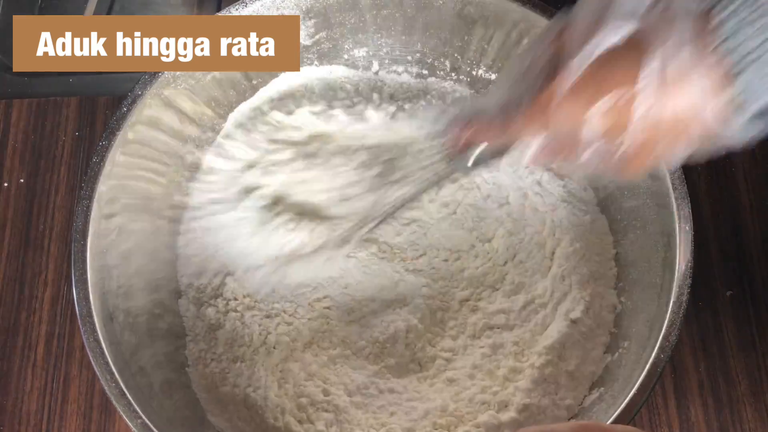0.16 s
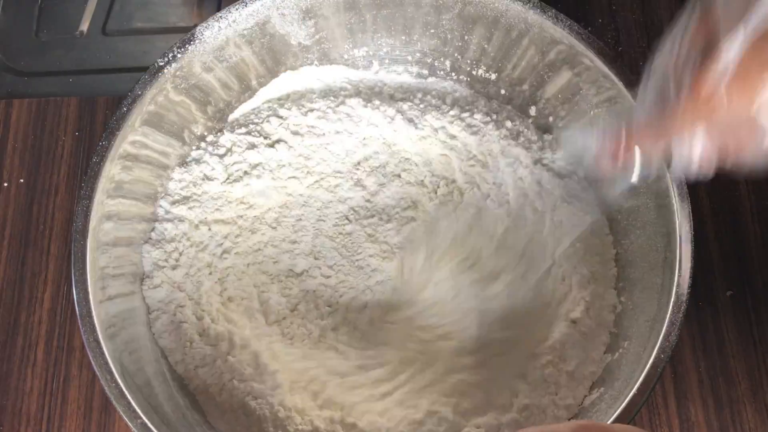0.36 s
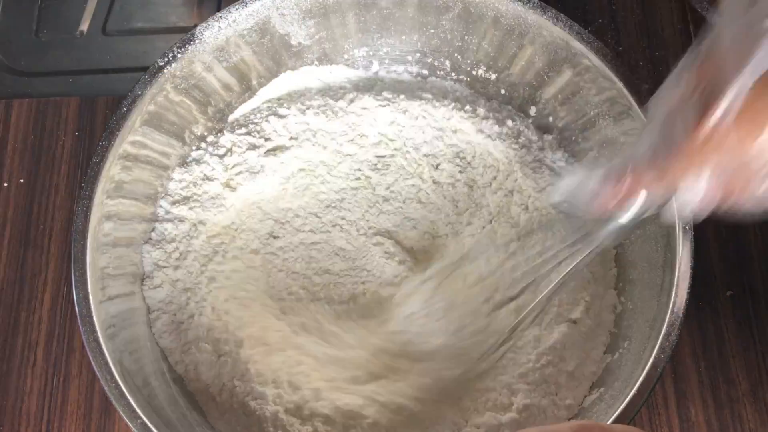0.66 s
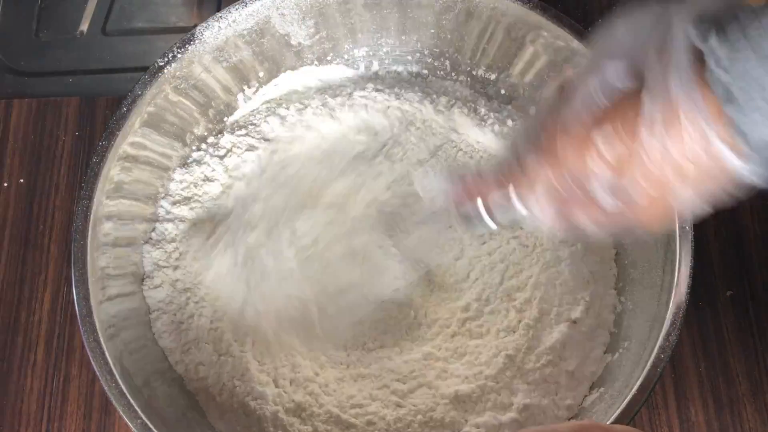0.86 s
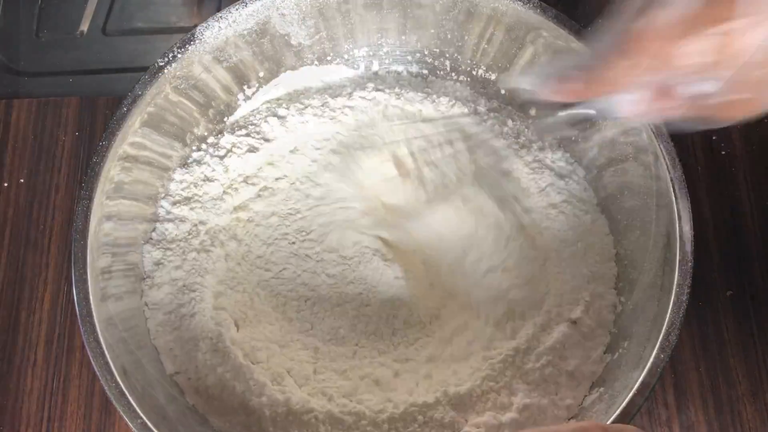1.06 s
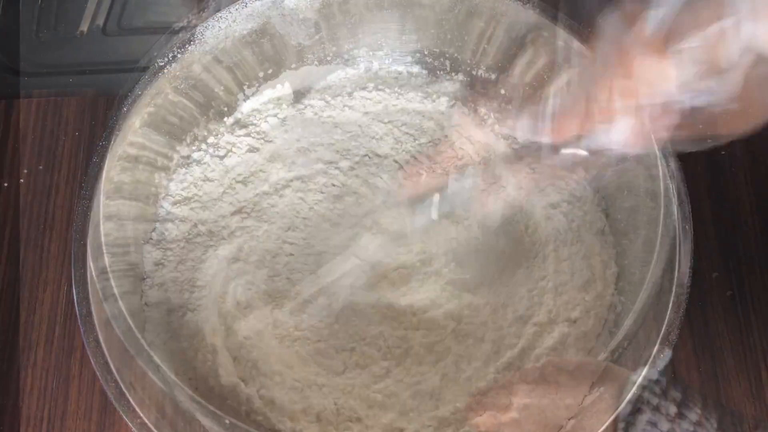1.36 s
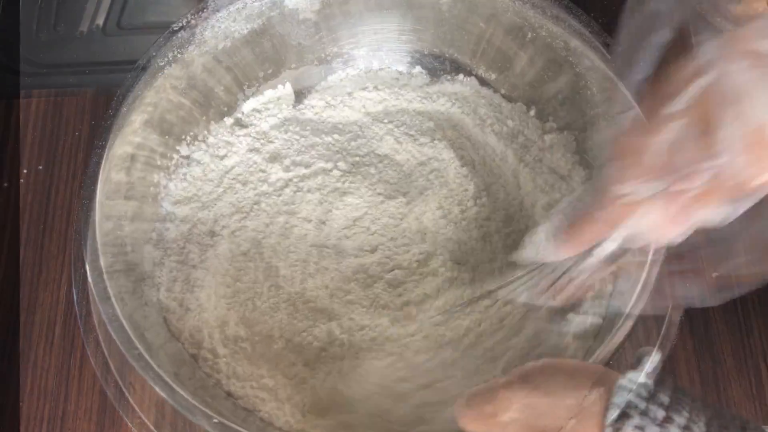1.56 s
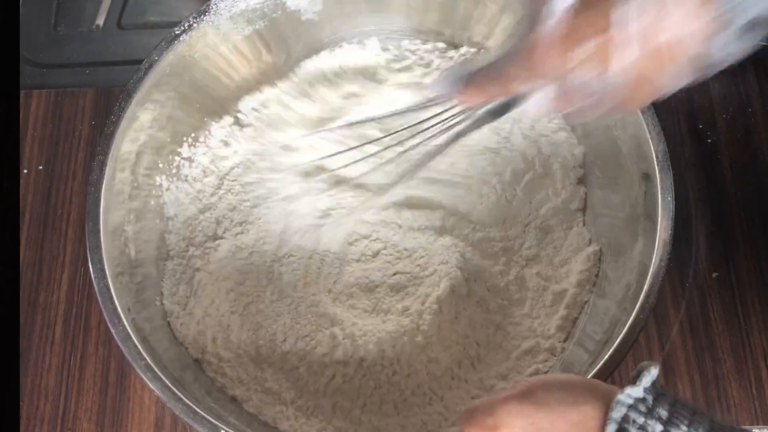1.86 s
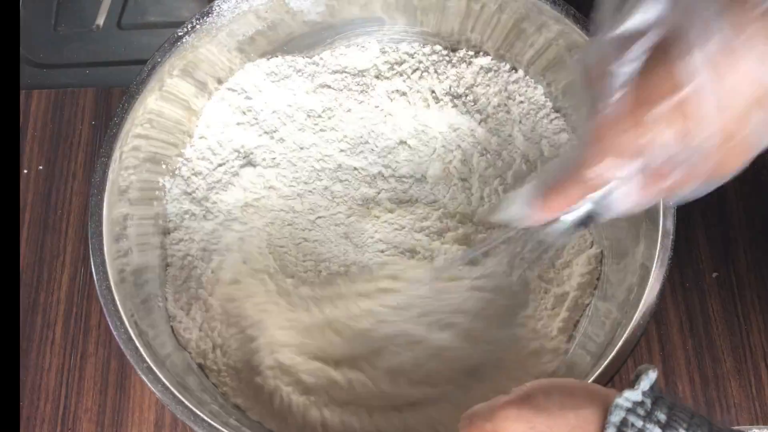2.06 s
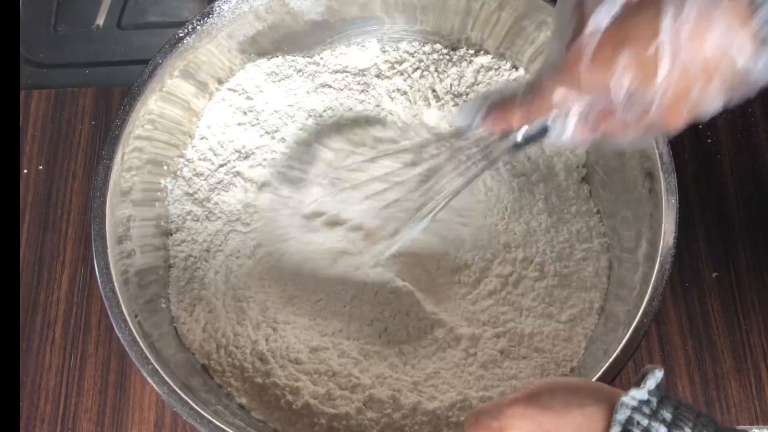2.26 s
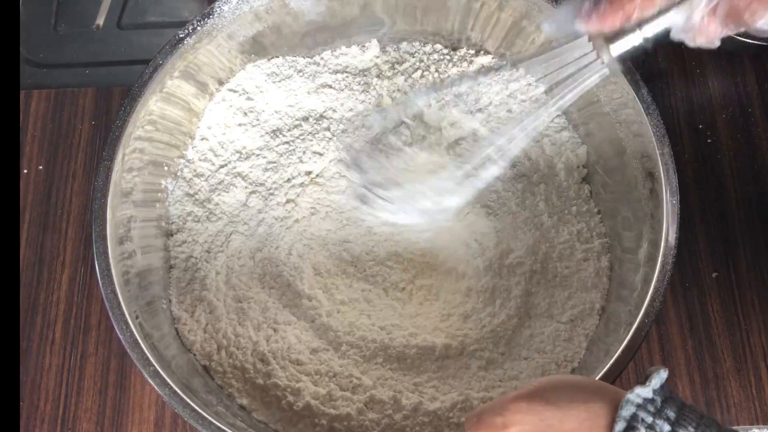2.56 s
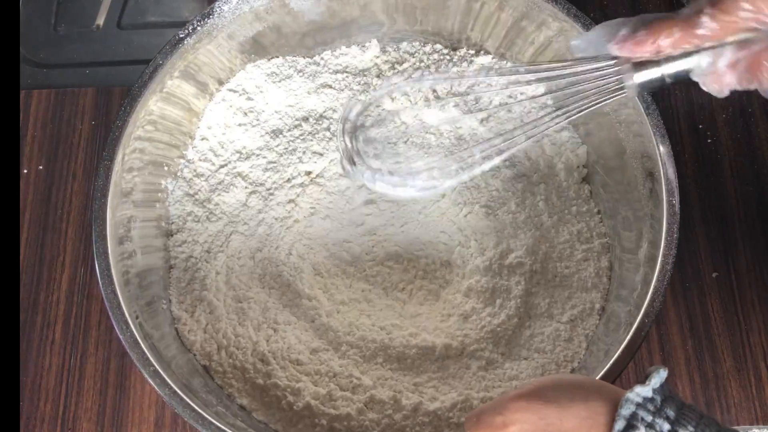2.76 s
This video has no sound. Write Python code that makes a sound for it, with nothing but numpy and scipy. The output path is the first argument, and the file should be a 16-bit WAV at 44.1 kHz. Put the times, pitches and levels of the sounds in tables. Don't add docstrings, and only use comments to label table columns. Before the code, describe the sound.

A wire whisk swishes quickly round through dry flour in a steel bowl, with grainy hiss, scrapes and dull bumps, then lifts and knocks the rim once; close microphone, quiet kitchen with faint hum.

```python
import sys
import numpy as np
from scipy import signal
from scipy.fft import rfft, irfft
from scipy.io import wavfile
from scipy.ndimage import uniform_filter1d

SR = 44100
rng = np.random.default_rng(int(sys.argv[2]) if len(sys.argv) > 2 else 0)


def inscribe(sig):
    pcm = np.round(np.clip(np.atleast_2d(sig).T, -1, 1) * 32767)
    wavfile.write(sys.argv[1], SR, pcm.astype(np.int16))


def boost(x):
    u = np.asarray(x, float) / 20
    return 10 ** u


N = 127890
T = np.arange(N) / SR

# frequency in Hz, density in dB per Hz.
POWDER_SPECTRUM = [(1760, -43), (3000, -18), (5530, -15.5), (6490, -9.5), (11500, -4), (13500, -2.5),
                   (15000, 1.5), (15800, 0)]
# frequency in Hz, width in Hz, level in dB.
WIRE_MODES = [(4600, 900, -6), (5620, 830, -2), (6700, 1600, -6.5), (8200, 4600, -1)]


def evened(x):
    return x / np.sqrt(np.mean(x ** 2) + 1e-20)


def evened_at(shape, x):
    return x / np.sqrt(np.sum((shape * x) ** 2) / np.sum(shape ** 2) + 1e-20)


def add(mix, s, sound):
    part = mix[round(s * SR):][:len(sound)]
    part += sound[:len(part)]


def coloured(x, points):
    f, db = np.transpose(points)
    log_hz = np.log(np.fft.rfftfreq(N, 1 / SR) + 1)
    gain = boost(np.interp(log_hz, np.log(f), db))
    return evened(irfft(rfft(x) * gain, N))


def resonate(x, hz, width):
    turn = np.exp(2j * np.pi * hz * np.arange(len(x)) / SR)
    r = np.exp(-np.pi * width / SR)
    return 2 * (turn * signal.lfilter([1 - r], [1, -r], x / turn)).real


def resonate_twice(x, hz, width):
    return resonate(resonate(x, hz, width), hz, width)


def bell(t, s, rise, fall):
    return np.exp(-.5 * ((t - s) / np.where(t < s, rise, fall)) ** 2)


def drift(hz):
    w = max(int(SR / hz / 2), 1)
    return evened(uniform_filter1d(uniform_filter1d(rng.standard_normal(N), w), w))


def grains(spread_db, lump_db, lump_hz, flick_db):
    size_db = spread_db * np.minimum(rng.exponential(1, N), 6)
    size_db = size_db + lump_db * drift(lump_hz) + flick_db * drift(320)
    return boost(size_db) * rng.standard_normal(N)


def patchy(x, patch_db):
    z = signal.stft(x, nperseg=512)[2]

    def patches(bins, frames):
        across = uniform_filter1d(rng.standard_normal(z.shape), bins, 0)
        return evened(uniform_filter1d(across, frames, 1))

    field_db = patch_db * patches(12, 7) + 3.2 * patches(2, 3)
    return evened(signal.istft(z * boost(field_db), nperseg=512)[1][:N])


def control(column):
    # time in seconds, powder spray in dB, wire pressure on the steel in dB,
    # push through the heap in dB.
    stirring = [(0.0, -37.5, -44.5, -48), (0.28, -29, -36.5, -40), (0.32, -29.5, -41.5, -44.5),
                (0.57, -33, -39.5, -40), (0.6, -29.5, -38, -39.5), (0.64, -30, -38.5, -44),
                (1.27, -31.5, -38, -39.5), (1.33, -37, -46.5, -45.5), (1.41, -37, -36, -39.5),
                (1.47, -38, -47, -46.5), (1.49, -38, -35, -40), (1.69, -37, -37.5, -41),
                (1.78, -31.5, -33, -33), (2.09, -36.5, -41.5, -41.5), (2.43, -37.5, -41.5, -41),
                (2.49, -54, -58, -55), (2.77, -46.5, -55.5, -51), (2.86, -48, -51.5, -52)]
    rows = np.array(stirring)
    return boost(np.interp(T, rows[:, 0], rows[:, column]))


def kitchen():
    # time in seconds, hum level in dB.
    hum_levels = [(0.0, -48), (0.13, -43), (0.96, -43.5), (1.01, -41.5), (1.46, -35.5), (1.49, -46),
                  (1.53, -32), (1.65, -42), (1.79, -37), (2.33, -45.5), (2.86, -41), (2.9, -48)]
    # multiple of the mains frequency, level in dB.
    hum_overtones = [(2, -51.5), (3, -56.5), (4, -59.5)]
    # frequency in Hz, density in dB per Hz.
    room_spectrum = [(35, -44), (60, -8.5), (167, -13.5), (249, -19.5), (525, -17.5), (1010, -27),
                     (1610, -19), (2330, -38), (15800, -38.5)]
    s, db = np.transpose(hum_levels)
    mains_hz = 49.54 + .08 * drift(2.5)
    turn = 2 * np.pi * np.cumsum(mains_hz) / SR
    hum = np.sqrt(2) * boost(np.interp(T, s, db)) * np.sin(turn + 0.33)
    for multiple, overtone_db in hum_overtones:
        waver_db = 2.5 * drift(6)
        hum += boost(overtone_db + waver_db) * np.sin(multiple * turn + .5 * drift(7.9))
    floor_db = -49 + 1.2 * drift(10)
    return hum + boost(floor_db) * patchy(coloured(rng.standard_normal(N), room_spectrum), patch_db=-0.5)


def whisk():
    # frequency in Hz, width in Hz, level in dB.
    heap_modes = [(1900, 1430, 15.5), (2835, 620, 4.5), (3440, 230, -1)]
    lumps = boost(.3 * drift(25) + .6 * drift(60) + .8 * drift(500))
    fizz = patchy(coloured(grains(2.35, 0.34, 21, 0.96), POWDER_SPECTRUM), patch_db=0.8)
    out = boost(2.5) * control(column=1) * fizz
    for column, modes, db in ((2, WIRE_MODES, 0.5), (3, heap_modes, -0.98)):
        drive = grains(2.37, 0.36, 30, 0.73)
        rung = sum(boost(d) * evened(resonate(drive, f, w)) for f, w, d in modes)
        out = out + boost(db) * control(column) * patchy(rung, patch_db=1.83)
    bare = np.clip(np.minimum(T - 1.2, 2 - T) / .03, 0, 1)
    singing = evened(resonate(grains(4.5, 2., 90, 3.2), hz=5830, width=400))
    out = out + boost(-7) * bare * control(column=2) * singing
    return out * lumps


def bowl():
    # frequency in Hz, width in Hz, level in dB.
    bowl_modes = [(186, 25, 8), (327, 72, 2.5), (472, 79, 3), (600, 69, 0.5), (807, 74, -5), (927, 47, 0),
                  (1162, 67, 2), (1590, 53, 1)]
    # centre in seconds, length in seconds, level in dB, colour in Hz.
    bottom_drags = [(0.095, 0.25, -45.5, 573), (0.435, 0.08, -42, 560), (.455, .06, -46, 1100),
                    (0.545, 0.034, -45, 600), (0.758, 0.064, -40.5, 635), (0.759, 0.051, -42, 1180),
                    (1.065, 0.14, -45, 520), (1.08, .14, -47, 1100), (1.25, 0.15, -58, 500),
                    (1.408, 0.065, -43.5, 927), (1.397, .05, -44, 600), (1.402, .025, -46, 1260),
                    (1.49, 0.034, -45, 1000), (1.511, 0.048, -43.5, 563), (1.563, 0.08, -44, 1010),
                    (1.57, .14, -46, 600), (1.726, 0.03, -37.5, 430), (1.783, 0.042, -44.5, 440),
                    (1.816, 0.04, -43.5, 380), (1.868, 0.032, -37.5, 500), (1.897, .09, -43.5, 414),
                    (1.644, .12, -48, 890), (1.65, .1, -46.5, 290), (2.145, 0.04, -42, 440),
                    (2.19, .04, -44, 480), (2.24, .06, -43, 500), (2.388, 0.07, -43, 640),
                    (2.487, 0.046, -61, 1600), (2.597, 0.083, -53, 1420)]
    colour_octaves = 0.32
    drive = grains(3., 1.2, 60, 1.5)
    rung = [boost(d) * evened(resonate(resonate(drive, f, 1.64 * w), f, 3 * w)) for f, w, d in bowl_modes]
    idle = evened(sum(rung) + 2.0 * evened(resonate(drive, 780, 930)))
    out = boost(-11.5) * control(column=3) * idle
    for s, length, db, hz in bottom_drags:
        shape = bell(T, s, .22 * length, 0.5 * length)
        answer = np.zeros(N)
        for ringing, (mode_hz, _, _) in zip(rung, bowl_modes):
            octaves_off = np.log2(mode_hz / hz)
            answer += ringing * np.exp(-.5 * (octaves_off / colour_octaves) ** 2)
        out += boost(db) * shape * evened_at(shape, answer)
    return out


def strokes():
    # centre in seconds, length in seconds, level in dB, colour in Hz.
    wall_strokes = [(0.256, 0.027, -36, 10000), (0.593, 0.028, -38.5, 3170), (.65, 0.034, -41, 13000),
                    (0.79, 0.12, -32.5, 14500), (0.888, 0.098, -40, 4040), (1.145, 0.031, -34, 13000),
                    (1.211, 0.045, -38.5, 2700), (1.252, 0.036, -32.5, 11900), (1.557, 0.04, -35, 13000),
                    (1.623, .05, -44, 5500), (1.958, 0.038, -35, 13800), (2.23, 0.065, -37, 12000),
                    (2.786, 0.034, -47.5, 5900), (.095, 0.062, -35.5, 11000), (.365, 0.014, -36, 13000),
                    (.41, 0.035, -36, 14000), (.48, .02, -36, 12000), (1.056, .03, -37.5, 6500),
                    (1.078, .02, -36, 13000), (1.415, .03, -38, 13000), (1.705, .02, -36, 13000),
                    (1.72, .015, -40, 12000), (2.362, .04, -42, 11000), (2.68, 0.036, -50, 5000),
                    (1.82, .12, -41, 1800), (.648, .008, -32, 12000)]
    drive = patchy(grains(1.4, 1.4, 60, 1.5), patch_db=-1.0)
    out = np.zeros(N)
    for s, length, db, hz in wall_strokes:
        near = slice(max(round((s - 2 * length) * SR), 0), round((s + 2 * length) * SR))
        shape = bell(T[near], s, .4 * length, .55 * length)
        hiss = resonate_twice(drive[near], hz, 0.74 * hz)
        out[near] += boost(db) * shape * evened_at(shape, hiss)
    return out


def bumps():
    # start in seconds, peak in dB, pitch in Hz, 60 dB decay in seconds.
    table_bumps = [(.13, -35, 190, 0.12), (1.21, -35.5, 173, 0.12), (1.433, -27, 62, 0.19),
                   (1.501, -20, 213, 0.063), (1.504, -17.5, 115, 0.087), (1.5325, -25, 78, 0.12),
                   (1.548, -27, 168, .1), (1.111, -32.5, 185, .08), (1.394, -34, 180, 0.088),
                   (1.8, -31.5, 185, .15), (2.14, -34, 180, .2), (1.75, -33, 100, .3),
                   (1.726, -21, 183, 0.081), (1.86, -22, 172.3, 0.13), (2.3, -34.5, 80, 0.14)]
    out, t = np.zeros(N), T[:9000]
    for s, db, hz, t60 in table_bumps:
        thud = np.sin(2 * np.pi * hz * t) + 0.33 * np.sin(2 * np.pi * 1.65 * hz * t)
        thud += 0.16 * evened(resonate(rng.standard_normal(len(t)), 2.7 * hz, 160))
        add(out, s, boost(db - 60 * t / t60) * np.minimum(t / 0.0078, 1) * thud)
    return out


def ticks():
    # start in seconds, peak in dB, pitch in Hz.
    wire_ticks = [(0.3985, -29.5, 6050), (0.9008, -20, 8200), (0.9293, -21, 3640), (1.034, -28.5, 6410),
                  (1.3495, -29, 5860), (1.399, -17.5, 6400), (1.486, -22.5, 5720), (1.6213, -22, 5690),
                  (1.723, -20, 6150), (1.92, -16.5, 5240), (2.1579, -26, 8170), (2.341, -34, 3100),
                  (2.358, -25, 5100), (2.6533, -35, 8900), (1.3683, -31, 5550), (1.92, -23, 7300),
                  (1.795, -27, 6700), (1.823, -23, 5600), (1.855, -24, 4800), (.5911, -25, 7850),
                  (2.8422, -37, 3440)]
    out, t = np.zeros(N), T[:9000]
    for s, db, hz in wire_ticks:
        scratch = rng.standard_normal(len(t)) * np.exp(-(t / 0.0045) ** 2) * np.minimum(t / 0.00078, 1)
        burst = resonate_twice(scratch, hz, 700)
        burst = burst + 0.36 * sum(resonate(scratch, f, 0.74 * w) for f, w, d in WIRE_MODES)
        add(out, s, boost(db + 1.0) * burst / abs(burst).max())
    return out


def trickle():
    # time in seconds, peak in dB.
    clump_falls = [(2.4738, -33), (2.5097, -38), (2.5247, -37), (2.5467, -32), (2.5631, -36), (2.5806, -37),
                   (2.5866, -33), (2.607, -38), (2.626, -27), (2.6529, -33), (2.6774, -33), (2.6893, -29),
                   (2.7153, -33), (2.7287, -33), (2.7397, -32), (2.7562, -32), (2.7706, -34), (2.7781, -29),
                   (2.845, -30), (2.8659, -22)]
    lift_s = 2.44
    lifted = np.clip((T - lift_s) / .12, .6, 1) * (T > lift_s)
    landings = (rng.random(N) < 200 / SR) * rng.uniform(.3, 1.5, N)
    falls = signal.oaconvolve(landings, np.hanning(110))[:N]
    falls *= boost(-44.0) * lifted
    for s, db in clump_falls:
        add(falls, s - .001, boost(db - 8.) * np.hanning(170))
    return falls * coloured(rng.standard_normal(N), POWDER_SPECTRUM)


def hush():
    return boost(-8. * np.clip(np.minimum(T - 2.818, 2.842 - T) / .005, 0, 1))


def knock():
    # frequency in Hz, level in dB, 60 dB decay in seconds.
    rim_modes = [(180, -16.5, 0.12), (329, -8.5, 0.06), (467, -23, .03), (600, -1, .018), (805, -25, 0.2),
                 (880, -24.5, 0.34), (930, -28, 0.2), (1160, -8, 0.035), (2100, -23.5, 0.042),
                 (2700, -16, 0.018), (3125, -15.5, 0.017), (1760, -16, 0.022), (5500, -27, 0.022),
                 (6230, -28, 0.027)]
    t, out = T[:4000], np.zeros(N)
    top_hz, end_hz, fall_s = 1900, 575, 0.00085
    peak_s, fade_s = 0.0042, 0.002
    hz = end_hz + (top_hz - end_hz) * np.exp(-t / fall_s)
    shape = np.minimum(0.08 + 0.92 * t / peak_s, np.exp(-(t - peak_s) / fade_s))
    sound = -boost(-5 - 1.5) * shape * np.sin(2 * np.pi * np.cumsum(hz) / SR)
    for f, db, t60 in rim_modes:
        rise = np.minimum(t / (0.0048 * (600 / f) ** 1.3), 1) ** 2
        delay_s = .0011 * min(1, 600 / f)
        sound += boost(db - 60 * t / t60) * rise * np.sin(2 * np.pi * f * (t - delay_s))
    crack = resonate(resonate(rng.standard_normal(len(t)), 4900, 3300), 5500, 4300)
    sound += boost(-25 - 60 * t / 0.026) * evened(crack)
    rumble = resonate(resonate(rng.standard_normal(len(t)), 750, 1100), 850, 3100)
    sound += boost(-28.0 - 60 * t / 0.33) * np.minimum(t / 0.0031, 1) * evened(rumble)
    shaken_grains = resonate_twice(grains(4.9, 1.1, 90, 2.2)[:len(t)], 2700, 2200)
    sound += boost(-31.0 - 60 * t / 0.12) * evened(shaken_grains)
    add(out, 2.8668, sound)
    return out


def scene():
    powder = hush() * (whisk() + strokes() + trickle())
    steel = bowl() + bumps() + ticks() + knock()
    return np.tile(kitchen() + powder + steel, (2, 1))


def band_limit(x):
    return signal.sosfilt(signal.butter(12, 17090, fs=SR, output="sos"), x)


def record(dry):
    lowpass = signal.firwin(4095, 15810, window=("kaiser", 9), fs=SR)
    mono = signal.oaconvolve(dry, lowpass[None], "same")
    top_band = signal.firwin(511, [13800, 15700], pass_zero=False, fs=SR)
    top = signal.oaconvolve(rng.standard_normal(N), top_band, "same")
    slip_shape = np.cos(np.pi / 2 * np.clip((T - 1.063) / .023, -1, 1))
    slip = boost(-38) * evened(top) * slip_shape
    return band_limit(mono + np.outer([1, -1], slip))


dry = scene()
out = record(dry)
inscribe(out)
```